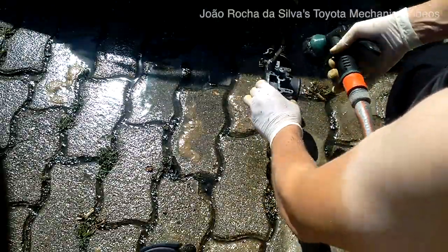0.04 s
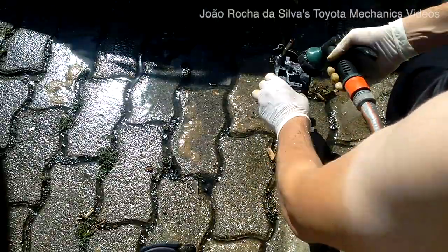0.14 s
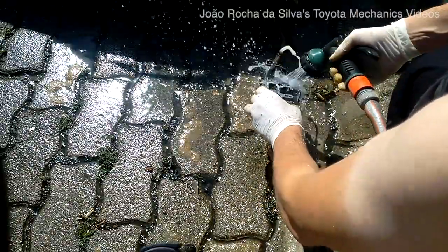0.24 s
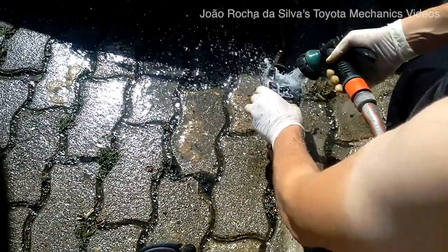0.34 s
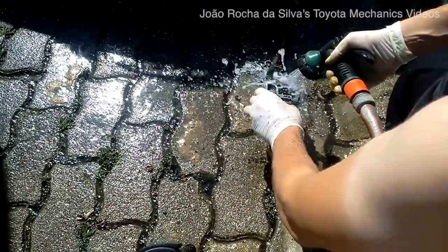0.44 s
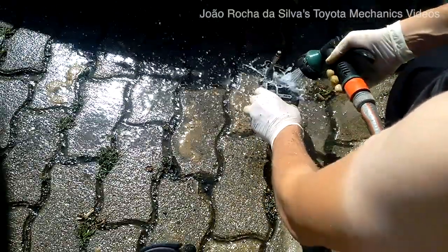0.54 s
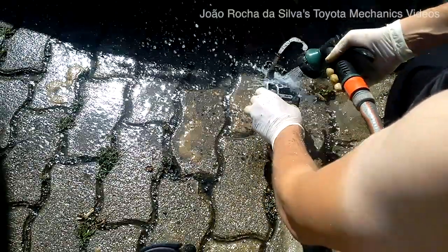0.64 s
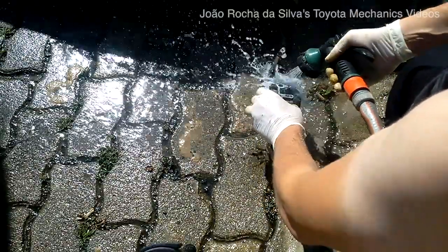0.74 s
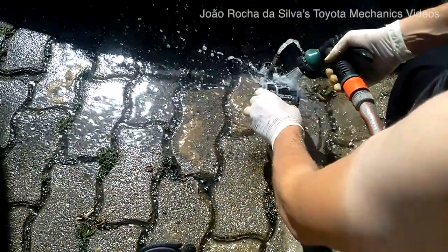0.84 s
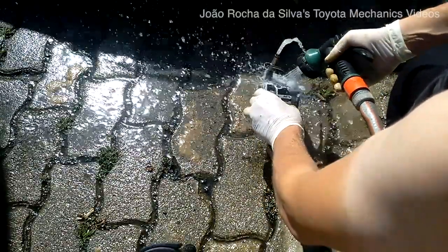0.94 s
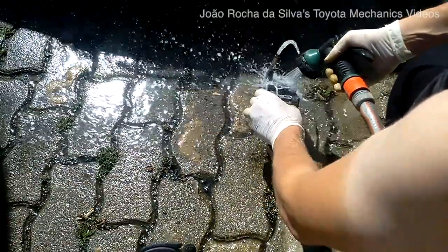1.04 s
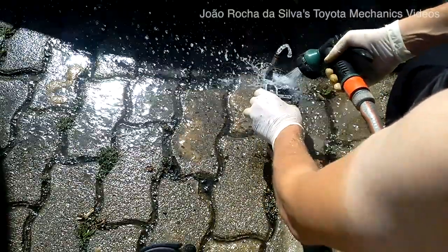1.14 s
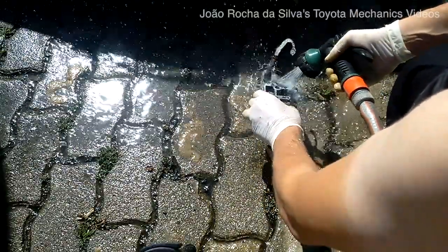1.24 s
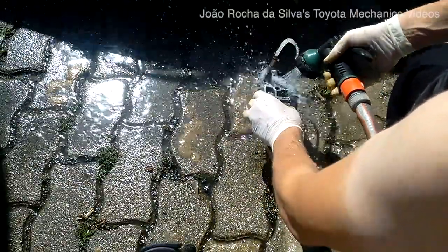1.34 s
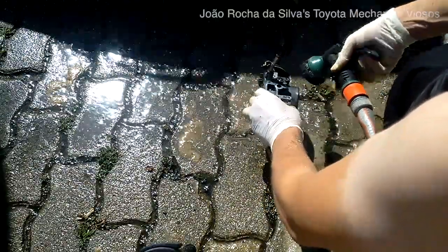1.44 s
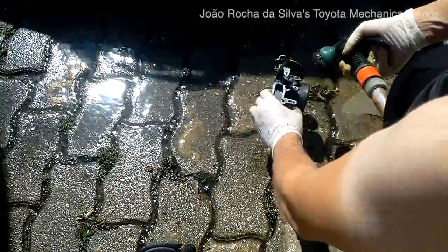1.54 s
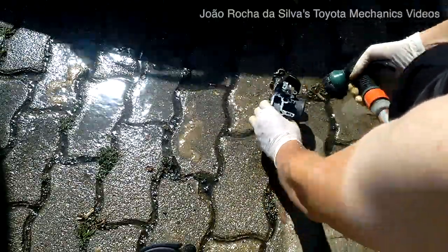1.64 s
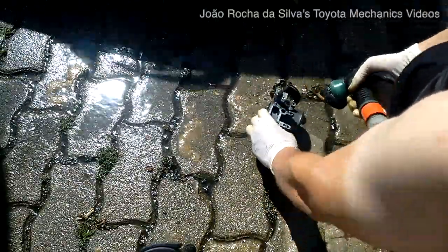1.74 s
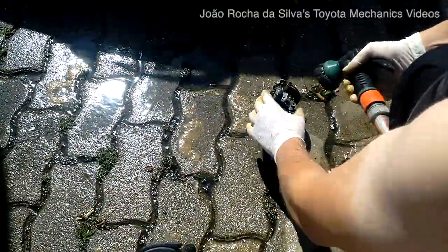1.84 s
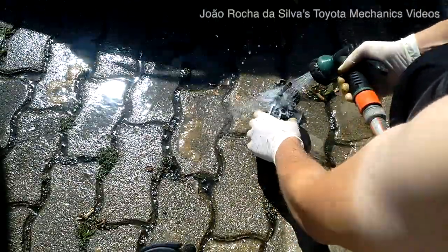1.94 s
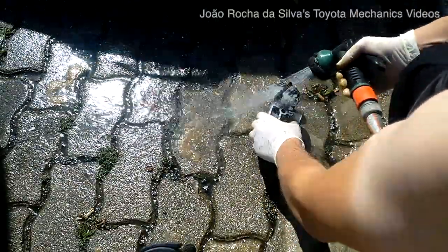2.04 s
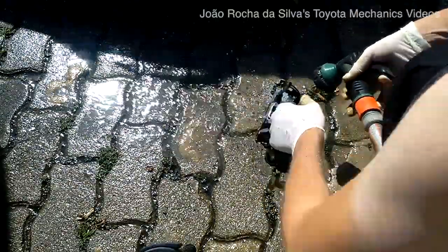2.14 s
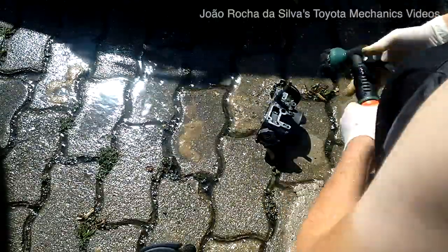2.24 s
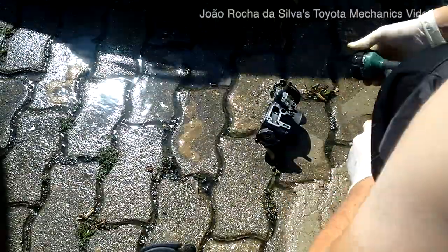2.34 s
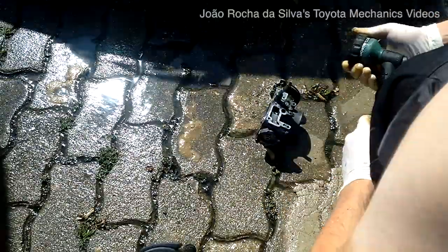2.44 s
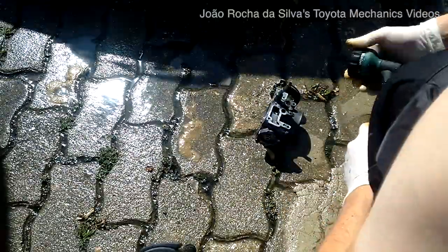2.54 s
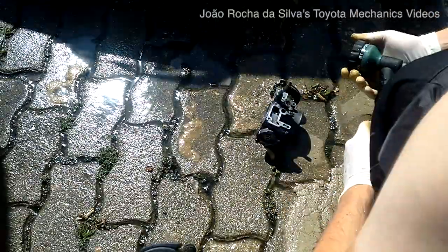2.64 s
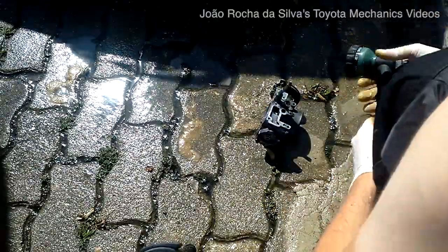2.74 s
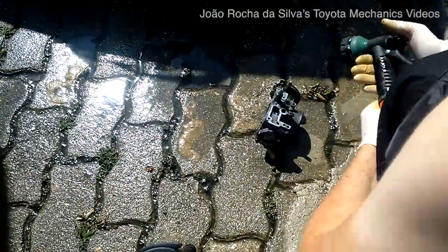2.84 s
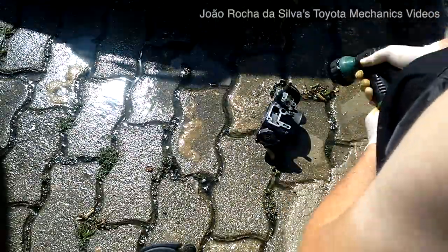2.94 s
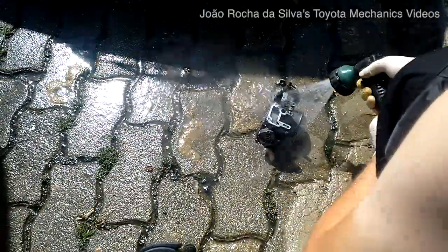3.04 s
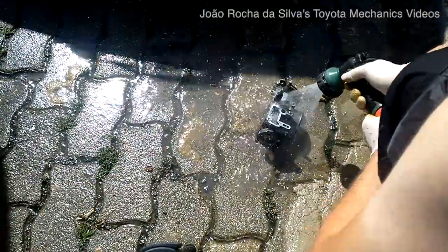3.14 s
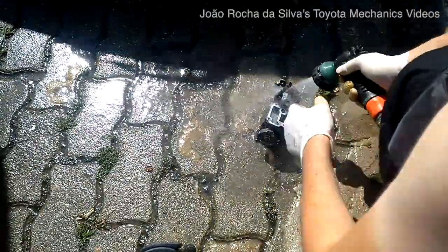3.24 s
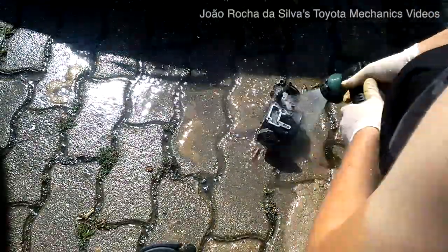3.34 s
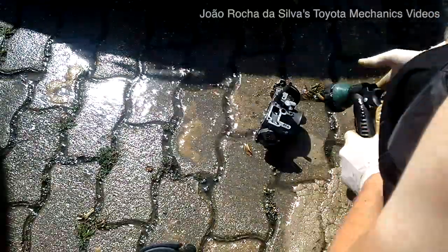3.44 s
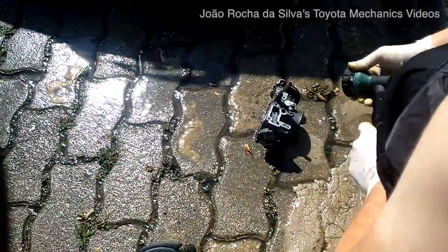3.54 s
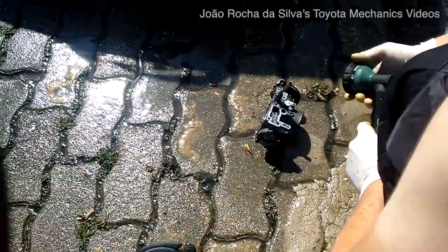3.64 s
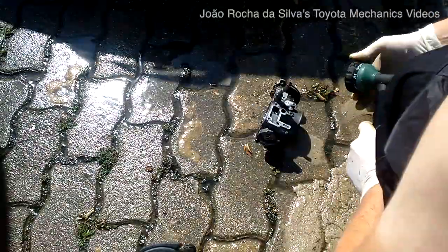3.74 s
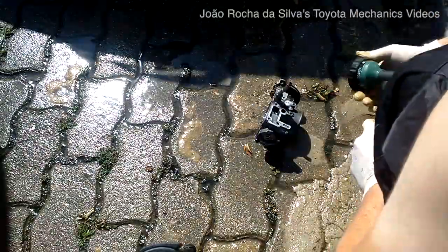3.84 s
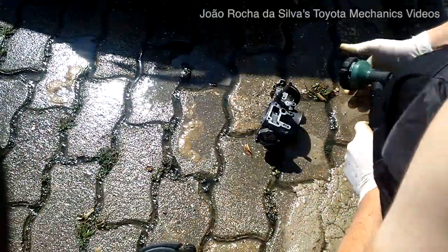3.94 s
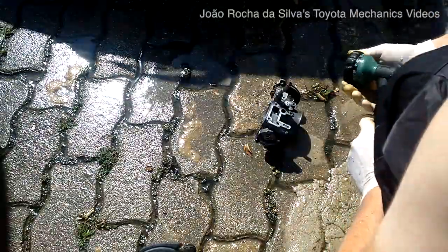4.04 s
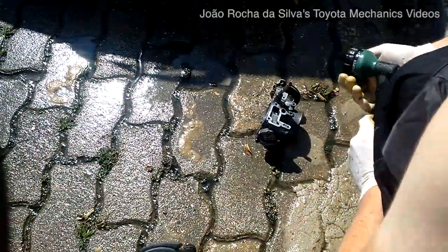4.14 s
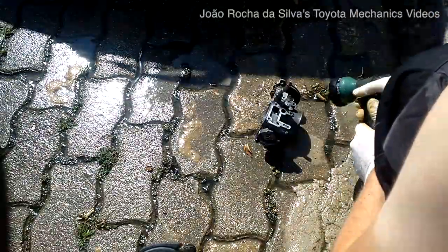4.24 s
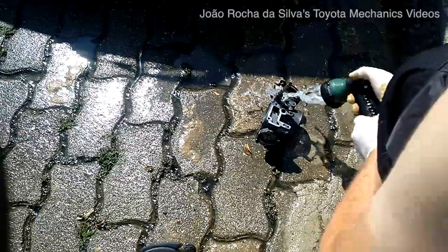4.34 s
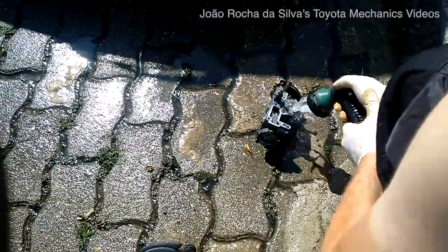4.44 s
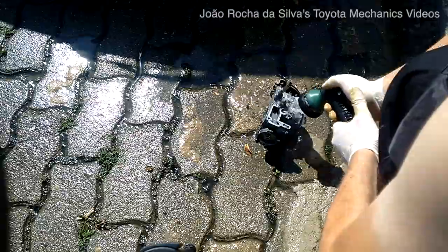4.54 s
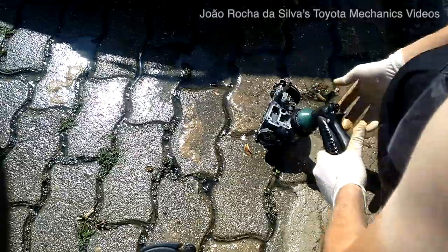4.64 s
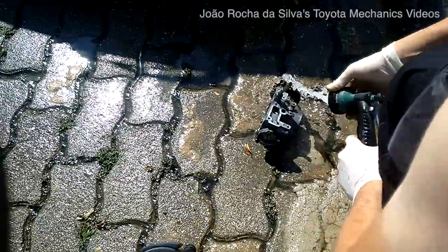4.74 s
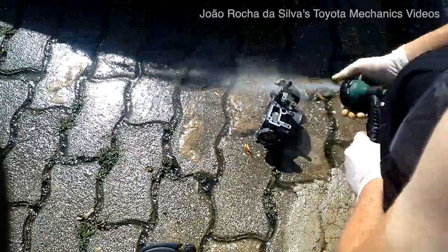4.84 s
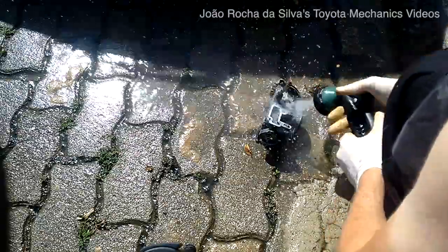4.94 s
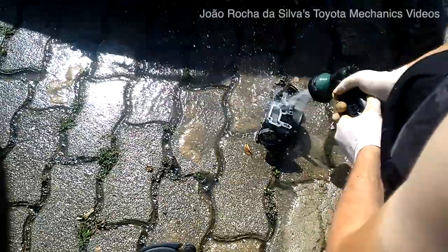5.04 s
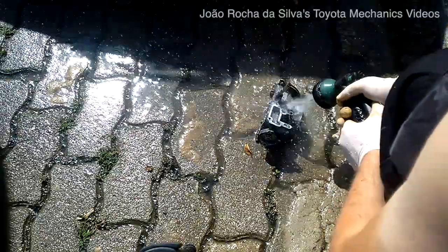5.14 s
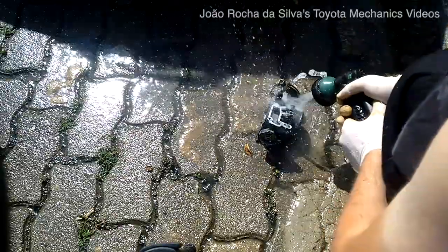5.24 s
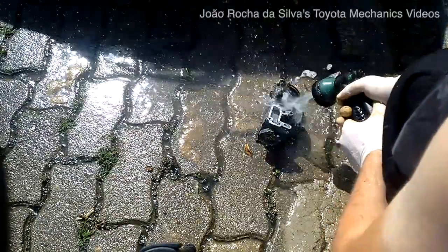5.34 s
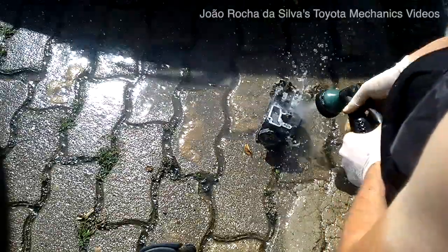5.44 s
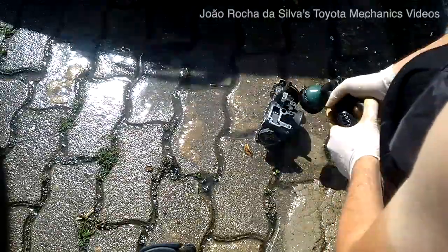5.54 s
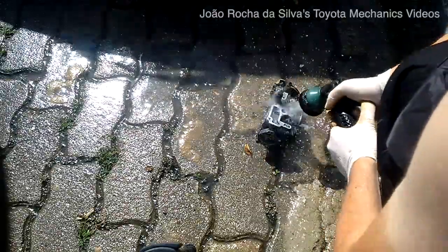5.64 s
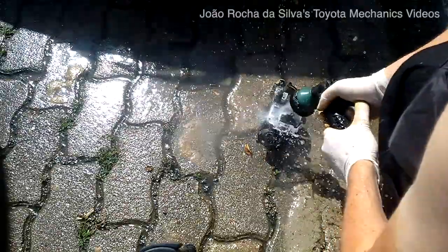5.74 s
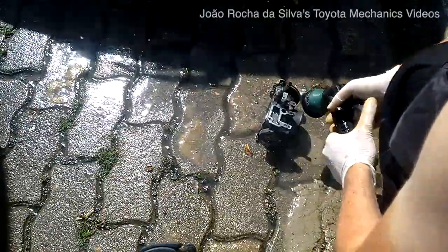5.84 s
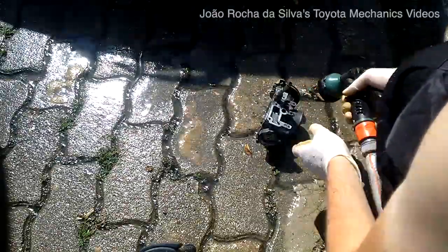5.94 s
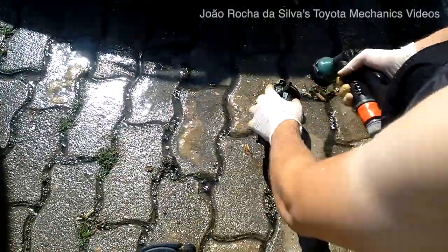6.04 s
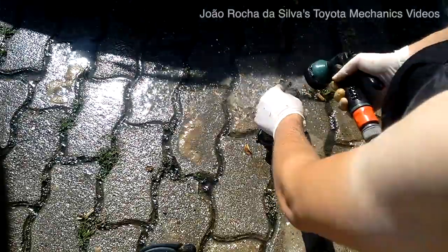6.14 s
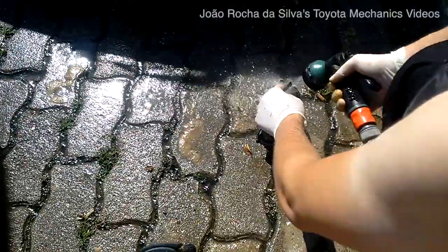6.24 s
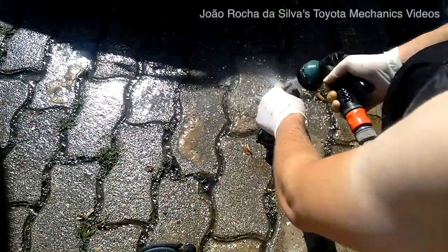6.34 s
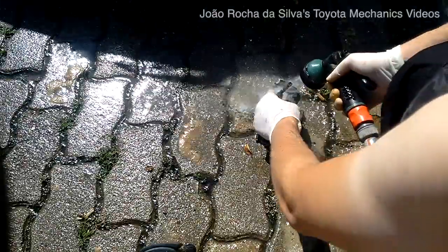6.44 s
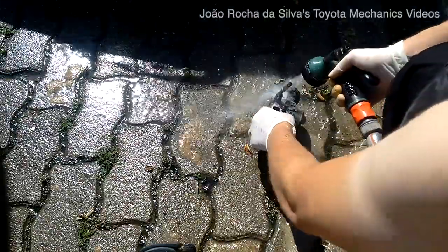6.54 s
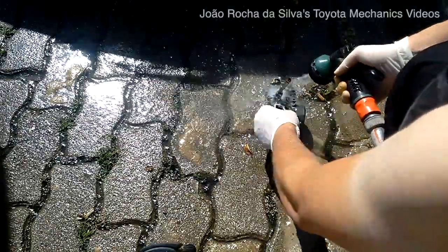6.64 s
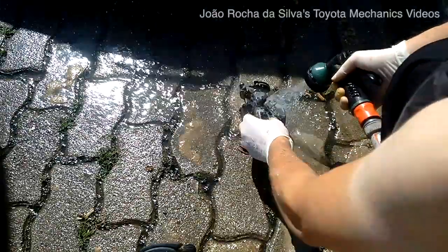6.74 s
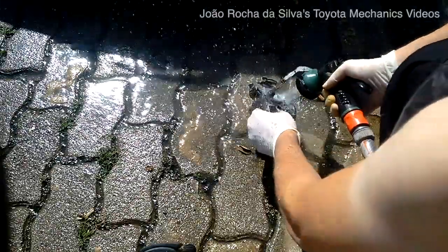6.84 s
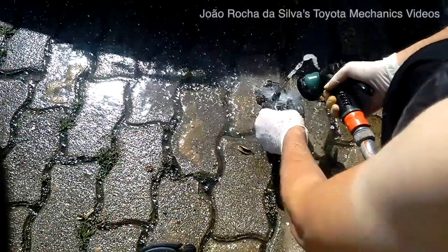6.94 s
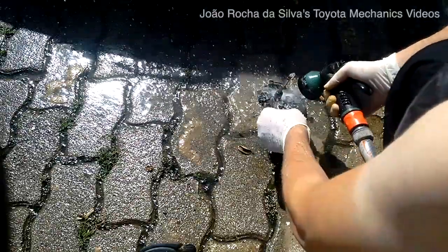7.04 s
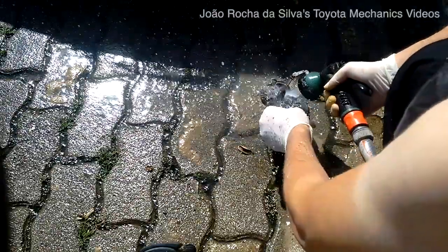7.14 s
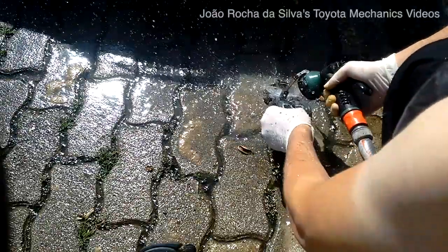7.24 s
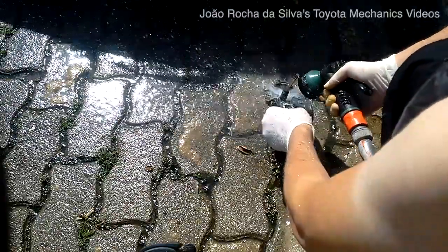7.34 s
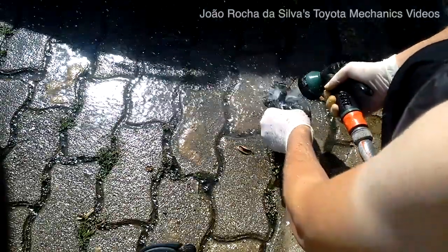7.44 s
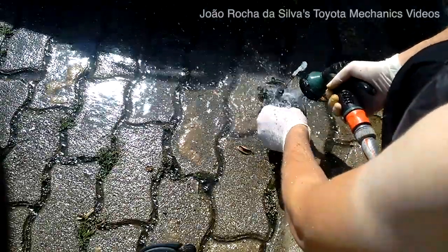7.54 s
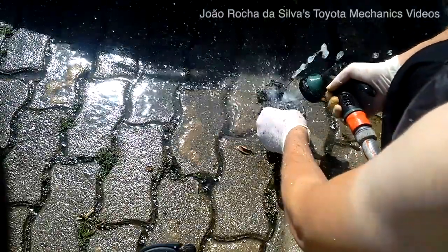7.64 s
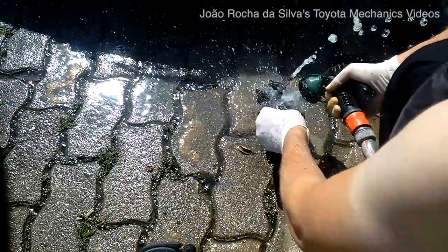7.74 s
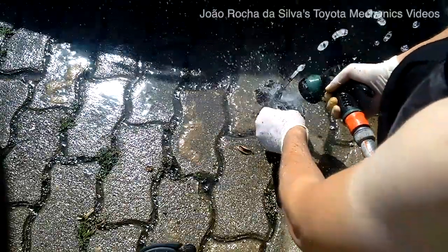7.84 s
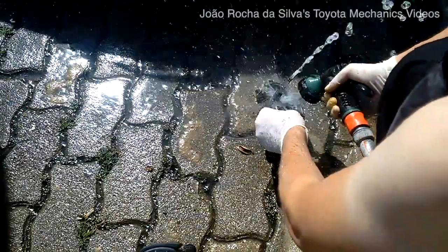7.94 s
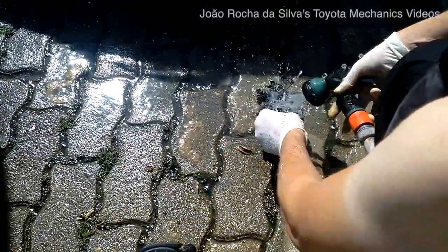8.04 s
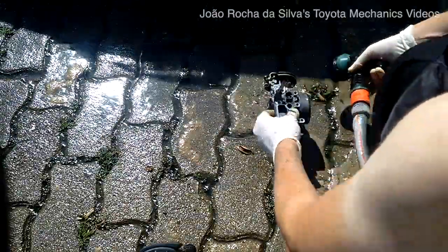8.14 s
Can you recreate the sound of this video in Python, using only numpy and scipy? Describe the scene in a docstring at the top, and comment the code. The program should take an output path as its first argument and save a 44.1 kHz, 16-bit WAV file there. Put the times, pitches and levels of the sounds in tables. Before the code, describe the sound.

Outdoors, close to a stereo microphone, a hose nozzle blasts a hollow metal part on paving: one long hissing burst, then two brief ones. Plastic dial clicks, a knock and faint scuffs fill the gaps. A stronger burst follows, splattering on stone, then a short one and a long, hollow-sounding final spray. Traffic rumbles softly underneath throughout.

```python
"""Passing traffic lies under the whole scene: low rumble, wheel drone, tyre roar and three engine notes.
Over it a hose gun rinses a hollow metal part on paving, close by: one long burst, then two brief ones.
After the first burst a valve pips and soft scuffs are heard; dial clicks and knocks follow between bursts.
The last three bursts, the first begun with another pip, bring jet on stone and stronger hollow sound.
Water is noise shaped by resonances, clicks are damped modes, and engine notes are wavering sines."""
import sys
import numpy as np
from scipy import signal
from scipy.fft import rfft, irfft, next_fast_len
from scipy.io import wavfile
from scipy.ndimage import uniform_filter1d, map_coordinates

SR = 44100
rng = np.random.default_rng(int(sys.argv[2]) if len(sys.argv) > 2 else 0)


def materialize(psi):
    """Save the field psi as 16-bit PCM at rate SR to the path in sys.argv[1].

    A 1-D psi becomes a single channel; in a 2-D psi each row is a channel.
    """
    bounded = np.clip(np.atleast_2d(psi).T, -1, 1)
    quanta = np.round(bounded * 32767).astype(np.int16)
    wavfile.write(sys.argv[1], SR, quanta)


N = 360729  # samples


def amp(db):
    """Level to amplitude: 20 dB is a factor of ten."""
    return 10 ** (np.asarray(db) / 20)


def unit(x):
    """Normalisation to an rms of 1."""
    return x / np.sqrt(np.mean(x ** 2) + 1e-20)


def along(points, hz):
    """Interpolation of (f/Hz, value) points on a logarithmic frequency axis."""
    f, v = np.transpose(points)
    return np.interp(np.log(hz + 1), np.log(f + 1), v)


def curves(rows):
    """Linear interpolation in time: one value per sample for each column after t/s."""
    s, *cols = np.transpose(rows)
    return [np.interp(np.arange(N) / SR, s, c) for c in cols]


def wobble(rate):
    """Slow random fluctuation: a smooth curve through Gaussian knots, rate of them a second."""
    knots = rng.standard_normal(int(N * rate / SR) + 4)
    return map_coordinates(knots, [np.arange(N) * rate / SR])


def filtered(x, response):
    """Linear filtering: the spectrum of x times a response of frequency."""
    m = next_fast_len(x.shape[-1] + 8192)
    spectrum = rfft(x, m) * response(np.fft.rfftfreq(m, 1 / SR))
    return irfft(spectrum, m)[..., :x.shape[-1]]


def shaped(points):
    """Spectral density: a table of (f/Hz, relative level/dB per Hz) as a gain."""
    return lambda hz: amp(along(points, hz))


def hollows(modes):
    """Resonance: squared sum of band-pass modes of alternating sign, cut at the very top."""
    def ring(f):
        return sum((-1) ** k * amp(db) * 1j * f * width / (centre ** 2 - f * f + 1j * f * width)
                   for k, (centre, width, db) in enumerate(modes))
    return lambda f: abs(ring(f)) ** 2 * (f < 15800)


# likeness of left and right noise: (f/Hz, correlation)
LIKENESS = [(60, 0.99), (110, 0.99), (200, 0.97), (380, 0.95), (700, 1), (1290, 0.99), (2380, 1),
            (4400, 0.88), (8120, 0.95), (15000, 0.73)]


def rush(gain, patchy_db, spiky_db=0):
    """Turbulence: partly correlated stereo noise of rms 1, with random patches and short spikes."""
    z = signal.stft(rng.standard_normal((2, N)), nperseg=512)[2]
    field = rng.standard_normal(z.shape[1:])
    field = uniform_filter1d(uniform_filter1d(field, size=6, axis=0), size=10, axis=1)
    patchy = signal.istft(z * amp(patchy_db * unit(field)), nperseg=512)[1][:, :N]
    pair = patchy * amp(spiky_db * wobble(900))

    def mid_side_gain(hz):
        turn = np.arccos(np.clip(along(LIKENESS, hz), -1, 1)) / 2
        return gain(hz) * np.array([np.cos(turn), np.sin(turn)])
    mid, side = filtered(pair, mid_side_gain)
    return unit(np.array([mid + side, mid - side]))


# the jet's aim, one list a pull: (t/s, fizz level/dB, then over the fizz:
# deep hollow level/dB, shallow hollows level/dB, splash level/dB)
JET_AIM = [
    [(.29, -38.5, -9.5, -11, -16), (.5, -37.5, -6.5, -4.5, -16), (.9, -36, -7.5, -8.5, -11),
     (1.15, -35, -5.5, -6, -12), (1.29, -34.5, -4, -8, -13), (1.43, -35.5, -9, -4.5, -16),
     (1.5, -38.5, -8, -13, -14.5)],
    [(2.04, -39, -19, -7.5, -16), (2.18, -39, -16, -12, -17), (2.22, -45, -9, -3, -10)],
    [(3.1, -38, -7.5, -9, -10.5), (3.3, -36.5, -12, -12, -11.5), (3.37, -39, -12, -12.5, -11),
     (3.48, -36.5, -9, -4.5, -10.5)],
    [(4.39, -39, -15.5, -9.5, -24), (4.71, -40, -9.5, -15, -27), (4.87, -39.5, -17, -12, -21),
     (4.89, -36.5, -14, -11, -4), (4.988, -38, -15, -11, -11), (5.004, -32, -8.5, -16, -10),
     (5.07, -30.5, -16, -15, -11.5), (5.1, -36.5, -13, -14, -11), (5.164, -30.5, -11.5, -16, -15.5),
     (5.56, -30.5, -10, -12.5, -11)],
    [(5.71, -31, -6, -11.5, -7), (5.8, -31.5, -7, -5.5, -6.5), (5.88, -33, -4.5, -10, -8)],
    [(6.19, -43.5, -11, -11, -9), (6.21, -39, -10, -5, -4.5), (6.47, -35.5, -7.5, -4, -5),
     (6.6, -37.5, -16, -12, -8.5), (6.846, -38.5, -11.5, -6, -9.5), (6.96, -32.5, -5.5, -8.5, -9),
     (7.346, -30, -1, -7.5, -10.5), (7.368, -33, -3.5, -8, -9), (7.568, -32, -1.5, -9.5, -10.5),
     (7.596, -34, -8, -4, -8.5), (7.65, -31, -4, -10, -9.5), (7.85, -30.5, -8, -9, -10.5),
     (8.084, -31, -8.5, -5.5, -10.5), (8.13, -35, -6.5, -7, -8.5)],
]
# spectra of droplets, splash and stone patter: (f/Hz, relative level/dB per Hz)
FIZZ_SPECTRUM = [(900, -51), (2000, -32), (2220, -18.5), (3500, -13), (6200, -14), (8400, -6.5),
                 (10300, -13), (11800, -13), (13200, -11.5), (15600, -15.5), (15850, -70), (16200, -120)]
SPLASH_SPECTRUM = [(100, -72.5), (300, -6.5), (750, -5), (1150, 1.5), (1600, -3.5), (2000, -8.5),
                   (3000, -11), (6000, -120)]
PATTER_SPECTRUM = [(200, -59.5), (400, 1), (800, -17), (1550, 2.5), (1900, -1.5), (2600, -23), (5000, -120)]
# water-blown hollows, their rim and the flat face: (f/Hz, width/Hz, relative level/dB before squaring)
DEEP_MODES = [(2480, 850, -1.5), (2954, 700, 3.5)]
SHALLOW_MODES = [(3240, 360, 2.5), (3860, 720, 1)]
RIM_MODES = [(4296, 610, 5), (5580, 1100, 3)]
FACE_MODES = [(2283, 450, 3)]
# the jet glancing onto the paving: (t/s, level over the fizz/dB)
STONE_LEVEL = [(4.36, -19), (4.9, -18.5), (5.2, -12), (5.6, -19), (5.7, -27)]
RIM_DB, RIM_DEEP = -1.2, 0.43  # rim over a mean of the hollow levels/dB, the deep one's share in it
FACE_DB = -14.5  # flat face over the fizz/dB
# a weaker jet loses treble: dB per octave above DULL_HZ for each dB of fizz under FULL_DB
DULLS, FULL_DB, DULL_HZ = 0.18, -32.5, 9100


def jet_colour(hz, s):
    """Superposition of incoherent sources: fizz and everything the jet strikes, added as powers."""
    aim_s, *aim_db = np.vstack(JET_AIM).T
    force, deep, shallow, splash = [np.interp(s, aim_s, db) for db in aim_db]
    rim = RIM_DEEP * deep + (1 - RIM_DEEP) * shallow + RIM_DB
    patter = np.interp(s, *np.transpose(STONE_LEVEL), left=-90, right=-90)
    parts = [(shaped(FIZZ_SPECTRUM), 0 * s), (hollows(DEEP_MODES), deep),
             (hollows(SHALLOW_MODES), shallow), (hollows(RIM_MODES), rim),
             (hollows(FACE_MODES), 0 * s + FACE_DB), (shaped(SPLASH_SPECTRUM), splash),
             (shaped(PATTER_SPECTRUM), patter)]
    power = sum(np.outer(unit(gain(hz)), amp(db)) ** 2 for gain, db in parts)
    octaves = np.log2(np.maximum(hz / DULL_HZ, 1))
    treble = amp(DULLS * np.outer(octaves, np.minimum(force - FULL_DB, 0)))
    return treble * np.sqrt(power)


# trigger pulls: (opens t/s, shuts t/s, rise t/s, dribble level/dB, dribble lasts t/s)
TRIGGER_PULLS = [(0.225, 1.519, 0.055, -65, 0.041), (1.999, 2.231, 0.043, -60, 0.038),
                 (3.059, 3.49, 0.031, -76.5, 0.034), (4.353, 5.564, 0.026, -60, 0.047),
                 (5.666, 5.891, 0.033, -65.5, 0.14), (6.154, 8.153, 0.013, -64, .02)]
SHUT_S = 0.031  # the valve closes


def spray():
    """Jet noise: droplets fizz, blow across hollows and splash on stone; a dribble follows each pull."""
    t = np.arange(N) / SR
    flow, dribble = np.zeros(N), np.zeros(N)
    for opens, shuts, rise, db, lasts in TRIGGER_PULLS:
        opening, closing = (t - opens) / rise, (shuts + SHUT_S - t) / SHUT_S
        flow += np.clip(np.minimum(opening, closing), 0, 1) ** 2
        dribble_s = [shuts - 0.01, shuts, shuts + lasts, shuts + lasts + 0.023]
        dribble += amp(db) * np.interp(t, dribble_s, [0, 1, 1, 0])
    surge_db = 0.66 * wobble(45) + 0.57 * wobble(12)  # the jet breaks up unevenly, all colours together
    force_db = curves(np.vstack(JET_AIM))[0]
    hz, s, z = signal.stft(rush(np.ones_like, patchy_db=1.24, spiky_db=0.5), SR, nperseg=512)
    water = signal.istft(z * jet_colour(hz, s), nperseg=512)[1][:, :N]
    drip_noise = rush(lambda f: shaped(FIZZ_SPECTRUM)(f) * np.sqrt(f), patchy_db=3.5, spiky_db=3.5)
    drips = amp(2.5 * wobble(50)) * drip_noise
    return flow * amp(force_db + surge_db) * water + dribble * drips


# dial detents and trigger knocks: (t/s, overall level/dB, low mode f/Hz, bright mode f/Hz,
# treble level/dB, rattle level/dB, left over right level/dB)
CLICK_EVENTS = [(2.5282, -16, 3576, 12800, -1, -16.5, -4), (2.6942, -16.5, 3560, 6750, -4.5, -11, 0),
                (2.9554, -14, 2660, 5300, -12, -17, -3.5), (2.9743, -24.5, 2760, 5260, -9, -21, -2.5),
                (3.4906, -16, 2650, 7400, -18, -21, -4), (3.928, -37, 3580, 9410, -1.5, -16, 1.5),
                (3.946, -26, 3570, 9100, -1.5, -13, 0), (4.0937, -22, 3590, 13000, -1, -12, -1),
                (4.1112, -42, 3590, 13100, -4, -19, -5), (4.2158, -19.5, 2810, 9300, -0.5, -18.5, -2),
                (4.89, -20, 3770, 9000, -4.5, -25, 4), (5.6924, -33, 2880, 6580, -15.5, -23, -7.5)]
# modes of the plastic dial, before random variation: (f/Hz, level/dB, t60 t/s)
DIAL_MODES = [(2370, -3, 0.0049), (4430, -16, 0.0043), (5180, -10.5, .006), (7040, -8, 0.0079),
              (8960, -5.5, 0.0068), (10640, 1, 0.0045), (14900, -10.5, 0.0055)]
# the gun's body: (f/Hz, width/Hz, relative level/dB before squaring); scuffs() plays it too
SHELL_MODES = [(350, 440, 3.5), (1000, 1200, 3), (1950, 330, 1.5), (2980, 930, -2), (3700, 490, 2.5),
               (5350, 1100, -8.5), (6950, 370, 0), (8570, 700, 0.5), (10500, 890, -1), (13200, 920, -1)]
RATTLE_S = 0.058  # t60 of the loose shell
RESONANT_DB, RESONANT_WIDTH_HZ = -4, 500  # the rattle dwells on each click's own two modes


def clicks():
    """Impact excitation: a detent snaps into short plastic modes and a crack, then the shell rattles."""
    out, t = np.zeros((2, N + SR)), np.arange(SR // 8) / SR
    soft = (1 - np.exp(-t / 0.00015)) ** 2
    for s, db, low_hz, bright_hz, treble_db, rattle_db, pan_db in CLICK_EVENTS:
        dial = 0
        for hz, level, t60 in DIAL_MODES:
            decay = amp(level + rng.normal(0, 3.2) - 60 * t / t60)
            dial = dial + decay * np.sin(2 * np.pi * hz * rng.normal(1, 0.014) * t)
        bright = 1.14 * amp(-60 * t / 0.006) * np.sin(2 * np.pi * bright_hz * t)
        crack = 1.7 * amp(-60 * t / 0.0036) * rng.standard_normal(len(t))
        low_decay = 0.43 * amp(-60 * t / 0.004) + 0.23 * amp(-60 * t / 0.018)  # broad blow, thin ring
        low = low_decay * np.sin(2 * np.pi * low_hz * t)
        own = hollows([(low_hz, RESONANT_WIDTH_HZ, 0), (bright_hz, RESONANT_WIDTH_HZ, 0)])
        loose = rng.standard_normal(len(t)) + 0.98 * rng.standard_normal((2, len(t)))
        loose = filtered(loose, lambda f: hollows(SHELL_MODES)(f) ** 0.36 + amp(RESONANT_DB) * own(f))
        rattle = (1 - np.exp(-t / 0.0025)) * amp(rattle_db - 60 * t / RATTLE_S) * unit(loose)
        snap = soft * (low + amp(treble_db) * (dial + bright + crack) + rattle)
        start = round(s * SR)
        out[:, start:start + len(t)] += amp(db) * amp([[pan_db / 2], [-pan_db / 2]]) * snap
    # too small to radiate bass
    return filtered(out[:, :N], lambda f: (1j * f / (1500 + 1j * f)) ** 2)


# the valve as it opens or shuts: (middle t/s, peak level/dB, f/Hz, lasts t/s)
VALVE_PIPS = [(1.52, -32, 1950, 0.0055), (4.363, -31.5, 3460, .0045)]


def pips():
    """Tone burst: a few cycles of one frequency under a raised-cosine envelope."""
    t, out = np.arange(N) / SR, np.zeros(N)
    for s, db, hz, lasts in VALVE_PIPS:
        swell = np.cos(np.pi * np.clip((t - s) / lasts, -0.5, 0.5)) ** 2
        out += amp(db) * swell * np.sin(2 * np.pi * hz * t)
    return out


# glove, hose and metal on stone: (t/s, lasts t/s, rms level before the taper/dB, centre f/Hz, spread/octaves)
SCUFF_EVENTS = [(0.031, 0.01, -70, 5500, 0.65), (0.427, 0.025, -52, 604, 1.6),
                (1.668, 0.022, -62, 6500, 0.94), (1.776, 0.0076, -45, 397, 2.5),
                (1.783, 0.011, -53.5, 600, 2.9), (1.795, 0.0043, -49.5, 500, 2.6),
                (1.948, 0.013, -64, 3930, 0.58), (2.293, 0.0074, -62, 3000, .8),
                (2.482, 0.04, -62.5, 4016, 0.7), (2.749, .04, -71, 4000, 0.5),
                (2.888, 0.03, -71, 4230, 0.36), (3.005, .028, -64, 10360, 0.77),
                (3.718, .045, -80.5, 6500, 1), (3.782, 0.0098, -58, 3540, 0.53),
                (3.836, 0.023, -68.5, 6460, 1.1), (3.929, 0.024, -42.5, 8100, 1.8),
                (4.306, 0.016, -68, 3670, 0.52), (4.336, .015, -69, 2300, 0.43),
                (5.999, .014, -73, 4500, .15)]


def scuffs():
    """Frictional excitation: grainy rubs through the shell's resonances, under a broad spectral hump."""
    out, grain = np.zeros((2, N + SR)), wobble(370)
    for s, lasts, db, hz, spread in SCUFF_EVENTS:
        start, n = round(s * SR), round(lasts * SR)
        rub = rng.standard_normal(n) + 0.44 * rng.standard_normal((2, n))
        rub = rub * amp(4 * grain[start:][:n])
        rub = filtered(rub, lambda f: hollows(SHELL_MODES)(f) ** 0.45)
        rub = unit(filtered(rub, lambda f: np.exp(-(np.log2((f + 1) / hz) / spread) ** 2)))
        out[:, start:start + n] += amp(db) * signal.windows.tukey(n, 0.35) * rub
    return out[:, :N]


# vehicles going by: (nearest t/s, distance over speed t/s, then at the nearest point:
# rumble level/dB, wheel drone level/dB, tyre roar level/dB, bright roar level/dB)
VEHICLES = [(.82, 0.14, -49.5, -49.5, -53.5, -76), (1.4, 0.37, -54, -61, -64, -78.5),
            (2.8, 0.37, -49, -48, -49.5, -58), (5.3, 0.16, -54.5, -54, -56, -64),
            (6.0, 0.44, -59.5, -50, -51.5, -64), (7.8, 0.91, -58.5, -58, -64, -62.5)]
# the same four layers with nothing near: level/dB each
FAR_LEVELS = [-61.5, -74.5, -66.5, -79.5]
# how steeply each layer fades: exponent of distance (1 = inverse distance)
DISTANCE_EXPONENTS = [.9, 1.6, 1.7, 2.2]


def passing():
    """Distance law: each road layer is the far road plus every vehicle, fading with its distance."""
    s, scale_s, *near_db = np.transpose(VEHICLES)
    t = np.linspace(0, N / SR, num=400)
    apart = np.hypot(1, (t - s[:, None]) / scale_s[:, None])  # in nearest distances
    levels = []
    for db, far_db, fade in zip(near_db, FAR_LEVELS, DISTANCE_EXPONENTS):
        near_power = ((amp(db)[:, None] * apart ** -fade) ** 2).sum(axis=0)
        levels.append(np.sqrt(amp(far_db) ** 2 + near_power))
    return curves(np.transpose([t, *levels]))


THROB_DB = 3  # an engine note swells unevenly


def tone(rows):
    """Frequency modulation: a slightly unsteady engine note that fades at the ends of its table."""
    hz, db = curves(rows)
    first, last = rows[0][0], rows[-1][0]
    edge = curves([(first - 0.05, 0), (first, 1), (last, 1), (last + 0.05, 0)])[0]
    phase = 2 * np.pi * np.cumsum(hz * (1 + 0.014 * wobble(15))) / SR
    return np.sqrt(2) * edge * amp(db + THROB_DB * wobble(8)) * np.sin(phase)


# three engine notes before their wavering, one list each: (t/s, f/Hz, level/dB)
ENGINE_NOTES = [
    [(0.3, 48.4, -61), (0.5, 55.5, -58), (0.68, 55.24, -50), (0.83, 55.5, -43), (0.92, 51.5, -56.5),
     (1.32, 53, -54), (1.58, 62.8, -55), (1.87, 70, -48.5), (2.02, 50.6, -49.5), (2.3, 44.16, -51.5),
     (2.43, 46.95, -48), (2.75, 47.56, -44), (2.98, 48.5, -51), (3.2, 51.5, -42.5), (3.47, 47.4, -49),
     (3.6, 48.2, -63)],
    [(5.6, 71.4, -65), (5.808, 82.3, -51), (5.902, 77.7, -60.5), (6.354, 80.5, -40), (6.68, 76.2, -60),
     (6.75, 74.2, -51.5), (7.116, 68.3, -46), (7.35, 65.4, -60)],
    [(7.9, 168, -61), (7.968, 163.3, -48), (8.134, 166, -50.5), (8.18, 167, -58)],
]
# spectra of the road layers and the open air: (f/Hz, relative level/dB per Hz)
RUMBLE_SPECTRUM = [(12, -63.5), (30, -0.5), (50, 4.5), (75, 6), (110, -0.5), (160, -61.5), (400, -120)]
WHEEL_SPECTRUM = [(50, -46), (130, 2), (250, 1.5), (380, -7), (600, -52), (1500, -120)]
TYRE_SPECTRUM = [(150, -52), (400, -0.5), (1000, 2.5), (1500, -0.5), (1950, -10.5), (2300, -21),
                 (3500, -35), (6000, -50.5), (9000, -120)]
BRIGHT_TYRE_SPECTRUM = [(900, -39.5), (1800, 3.5), (2600, -1), (3100, -16.5), (5000, -28), (8000, -120)]
AIR_SPECTRUM = [(1500, -30.5), (3000, 7.5), (6000, -0.5), (8400, -3), (12500, -5.5), (14000, -24),
                (15000, -120)]


def traffic():
    """Band noise and tones: rumble, wheel drone, tyre roar and engines, under faint open air."""
    rumble, wheels, tyres, bright = passing()
    low = rumble * rush(shaped(RUMBLE_SPECTRUM), patchy_db=2.0)
    low += wheels * rush(shaped(WHEEL_SPECTRUM), patchy_db=1.8)
    roar = tyres * rush(shaped(TYRE_SPECTRUM), patchy_db=2.0)
    roar += bright * rush(shaped(BRIGHT_TYRE_SPECTRUM), patchy_db=4.0)
    breeze_db = 1.5 * wobble(12)
    air = amp(-84.0 + breeze_db) * rush(shaped(AIR_SPECTRUM), patchy_db=2.0)
    return low + roar + air + sum(tone(rows) for rows in ENGINE_NOTES)


# level between the ports: (f/Hz, left over right level/dB)
PORT_LEAN = [(60, -2.0), (110, -2), (200, -1.0), (380, -1.0), (700, -0.5), (1290, -2.5), (2380, -1),
             (4400, -3), (8120, -1.5), (15000, -1.5)]
# the two microphone ports sit apart: (f/Hz, phase by which the left leads/rad)
PORT_LEAD = [(0, 0.18), (6290, -0.36), (11100, -0.32), (12000, -1.3), (13000, -0.2), (15800, -0.18),
             (16300, -0.8), (16500, -0.37)]


def scene():
    """Interaural-style differences: all but the clicks is a little quieter and phase-shifted at the left."""
    def lean(hz):
        left_over_right = amp(along(PORT_LEAN, hz)) * np.exp(1j * along(PORT_LEAD, hz))
        return left_over_right ** np.array([[0.5], [-0.5]])  # half to each port
    return filtered(spray() + pips() + scuffs() + traffic(), lean) + clicks()


TOP_HZ = 16950


def record(dry):
    """Band limiting: nothing passes at or above the top frequency."""
    return filtered(dry, lambda hz: hz < TOP_HZ)


dry = scene()
out = record(dry)
materialize(out)
```